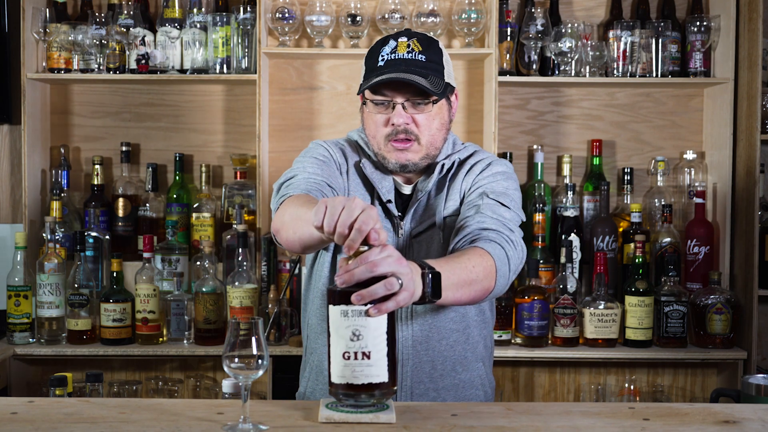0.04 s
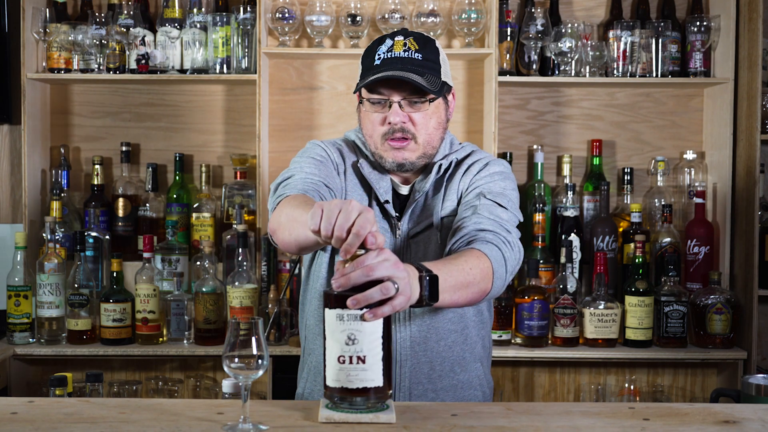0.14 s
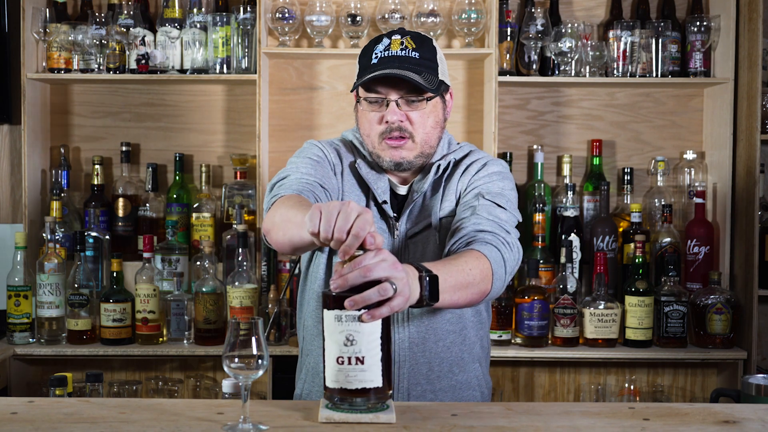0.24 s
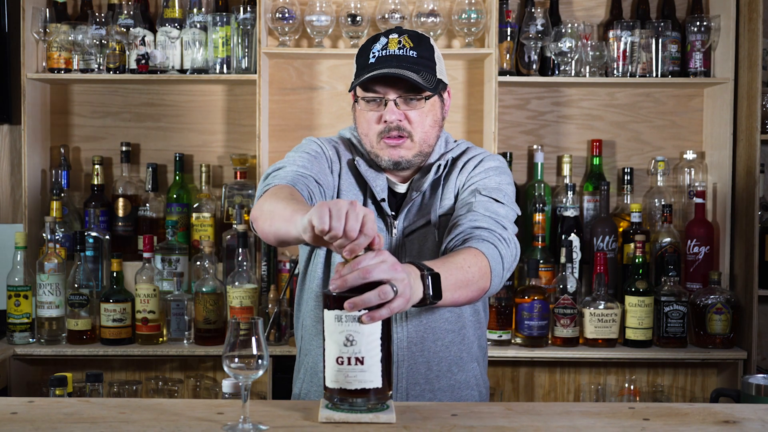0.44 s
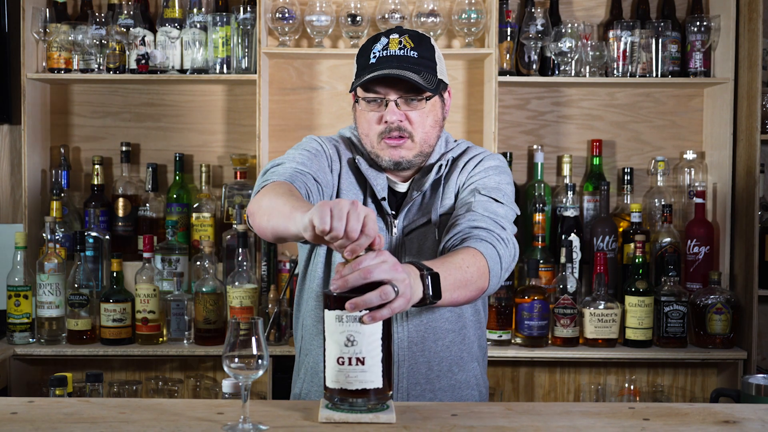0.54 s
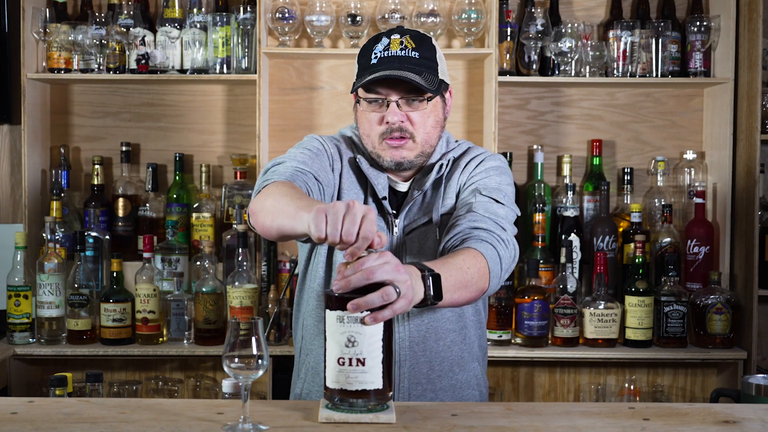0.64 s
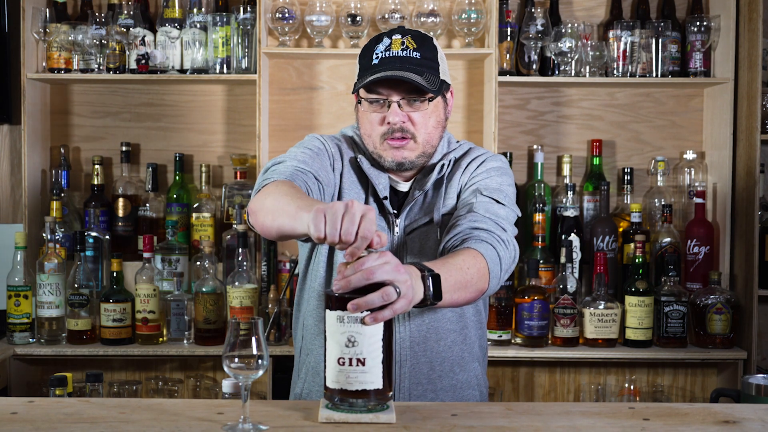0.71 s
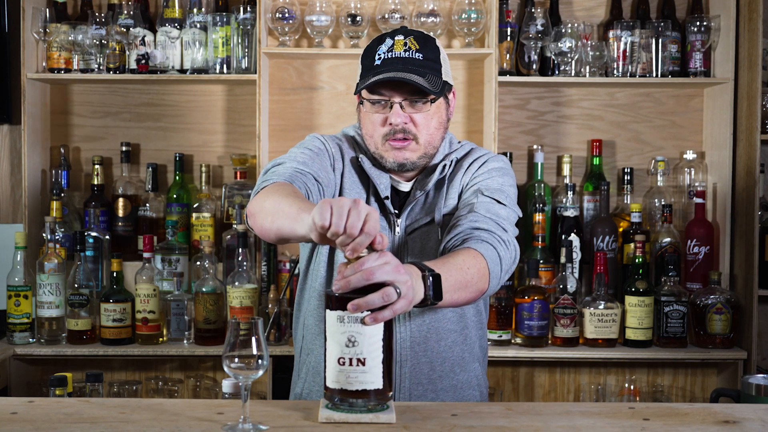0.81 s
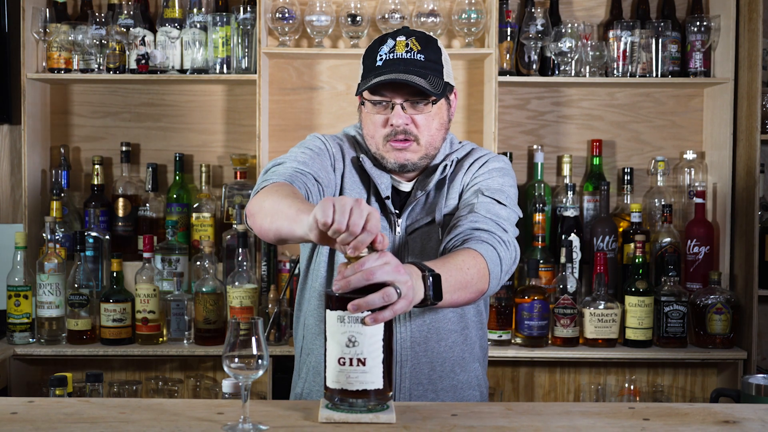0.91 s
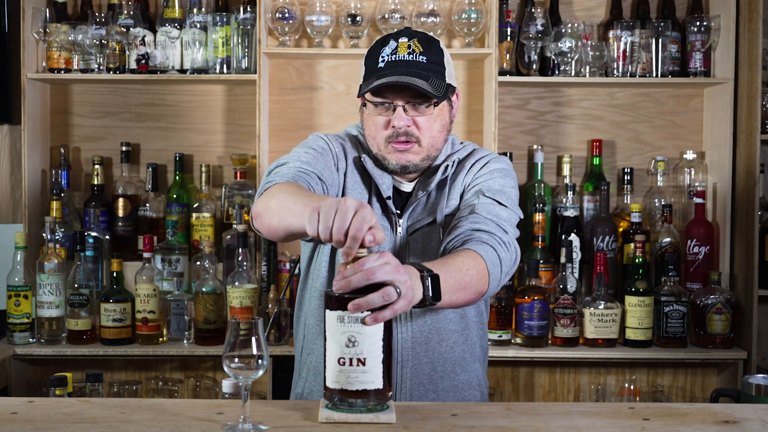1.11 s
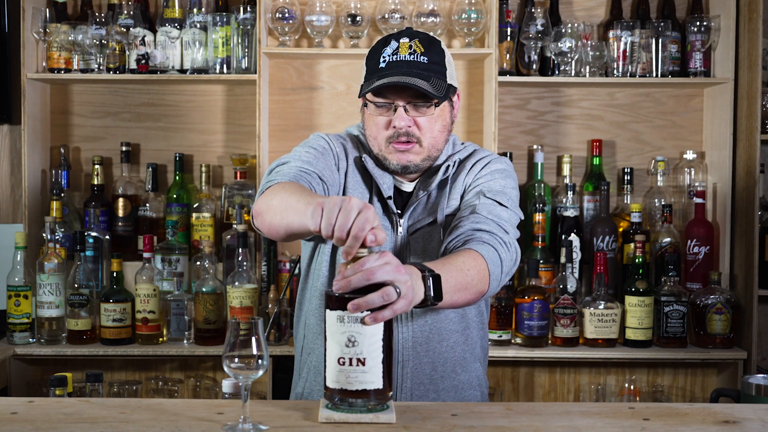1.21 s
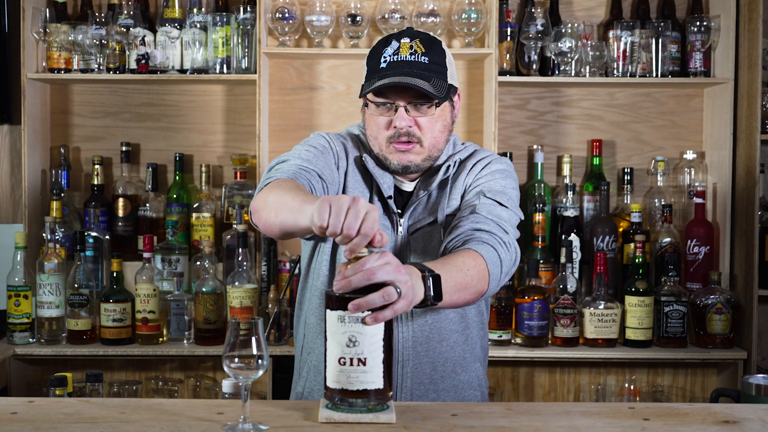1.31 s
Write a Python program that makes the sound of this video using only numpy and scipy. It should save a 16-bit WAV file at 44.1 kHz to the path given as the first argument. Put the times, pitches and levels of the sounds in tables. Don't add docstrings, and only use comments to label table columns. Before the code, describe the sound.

Cork stopper being worked loose from a bottle, with small clicks and finger friction around three woody knocks that get softer each time, scattered short reflections from shelves, low room tone, muffled mono recording.

```python
import sys
import numpy as np
from scipy import signal
from scipy.io import wavfile
from scipy.ndimage import uniform_filter1d

SR = 44100
rng = np.random.default_rng(int(sys.argv[2]) if len(sys.argv) > 2 else 0)


def dump(signal):
    limited = np.clip(np.atleast_2d(signal).T, -1, 1)
    pcm = np.round(limited * 32767).astype(np.int16)
    wavfile.write(sys.argv[1], SR, pcm)


def undo_db(level):
    steps = np.asarray(level, float) / 20
    return 10 ** steps


N = 59535


def evened(x):
    return x / np.sqrt(np.mean(x ** 2) + 1e-20)


def read_colour(points, hz):
    f, level = np.transpose(points)
    return np.interp(np.log(hz + 1), np.log(f + 1), level)


def read_level(points):
    t, level = np.transpose(points)
    return np.interp(np.arange(N) / SR, t, level)


def add(mix, s, sound):
    part = mix[round(s * SR):][:len(sound)]
    part += sound[:len(part)]


# [f/Hz, level/dB per Hz]
ROOM_COLOUR = [(30, -28.5), (70, 3.5), (120, -5), (380, -7.5), (600, -18), (1430, -18), (2500, -24.5),
               (7500, -33)]
# [t/s, level/dB]
ROOM_LEVEL = [(0, 2.5), (.2, 3.5), (0.272, -2.5), (.39, -1), (.42, 3), (.66, 3), (.8, -1), (1, 0.5),
              (1.1, -0.5), (1.199, 5.5), (1.35, -4.5)]


def room():
    room_db, patch_db, swell_db = -66, 2.5, .7
    frames, hz = N // 256 + 5, np.fft.rfftfreq(1024, 1 / SR)
    real, imaginary, patches = rng.standard_normal((frames, 513, 3)).T
    patches = uniform_filter1d(patches, size=6, axis=0)
    patches = evened(uniform_filter1d(patches, size=8, axis=1))
    swell = evened(uniform_filter1d(rng.standard_normal(frames), size=12))
    level = read_colour(ROOM_COLOUR, hz)[:, None] + patch_db * patches + swell_db * swell
    spectra = (real + 1j * imaginary) * undo_db(level)
    tone = signal.istft(spectra, nperseg=1024, noverlap=768)[1][:N]
    return undo_db(room_db + read_level(ROOM_LEVEL)) * evened(tone)


# [t/s, level/dB]
RUB_LEVEL = [(0, -70.5), (.2, -69), (.27, -86.5), (.34, -82.5), (0.378, -64), (0.452, -58), (.49, -65.5),
             (0.549, -55.5), (.59, -62), (.62, -79), (.68, -67), (0.712, -98), (0.849, -80), (1.03, -68.5),
             (1.1, -78), (1.23, -70), (1.27, -84.5), (1.33, -66.5)]
# [f/Hz, level/dB per Hz]
RUB_COLOUR = [(300, -25), (600, -8.5), (1000, 7), (2000, 4.5), (3500, 2), (5000, -4.5), (7500, -3.5)]


def rub():
    grains_per_s, grain_db, smooth_share = 2500, 3, .6
    sizes = undo_db(grain_db * np.minimum(rng.exponential(1, N), 5))
    grains = sizes * (rng.random(N) < grains_per_s / SR) * rng.choice([-1., 1.], N)
    drive = smooth_share * rng.standard_normal(N) + (1 - smooth_share) * evened(grains)
    hz = np.fft.rfftfreq(N, 1 / SR)
    colour = undo_db(read_colour(RUB_COLOUR, hz)) * (hz > 400)
    friction = np.fft.irfft(np.fft.rfft(drive) * colour, N)
    return undo_db(read_level(RUB_LEVEL)) * evened(friction)


# [t/s, peak level/dB, centre f/Hz]
TICKS = [(0.0517, -47.5, 5500), (.1088, -46.5, 4500), (0.1365, -40, 3500), (0.1759, -47.5, 5000),
         (.1947, -70, 3500), (0.403, -49, 4500), (.4475, -39, 4500), (0.4642, -44, 5000), (.520, -44, 5000),
         (0.7841, -44.5, 4500), (0.9617, -50.5, 4500), (1.1845, -47.5, 3600), (1.2185, -48, 2500),
         (1.2373, -44.5, 3000)]


def ticks():
    width_s = .00008
    out, t = np.zeros(N), np.arange(-40, 41) / SR
    for s, db, hz in TICKS:
        swell = np.exp(-.5 * (t / width_s) ** 2)
        add(out, s + t[0], undo_db(db) * swell * np.cos(2 * np.pi * hz * t))
    return out


def blow(modes):
    rise_s = 0.00027
    t, out = np.arange(6000) / SR, np.zeros(6000)
    for hz, db, t60, full in modes:
        swell = (t / full) ** (np.log(1000) * full / t60)
        decay = undo_db(db - 60 * (t - full) / t60)
        out += decay * swell * np.sin(2 * np.pi * hz * t)
    return np.minimum(t / rise_s, 1) ** 2 * out


def clump(s, spread, db, low_hz, high_hz):
    band = signal.butter(8, [low_hz, high_hz], "band", fs=SR, output="sos")
    swell = np.exp(-.5 * ((np.arange(N) / SR - s) / spread) ** 2)
    return undo_db(db) * swell * signal.sosfilt(band, rng.standard_normal(N))


def jolt(modes, blows, shelf, echoes):
    t, out = np.arange(6000) / SR, np.zeros(N)
    for s, db in blows:
        add(out, s, undo_db(db) * blow(modes))
    hum = sum(undo_db(db - 60 * t / t60) * np.sin(2 * np.pi * hz * t) for hz, db, t60 in shelf)
    taps = sum(clump(*row) for row in echoes)
    return out + signal.oaconvolve(taps, hum / np.linalg.norm(hum))[:N]


# [f/Hz, level/dB, time to fall 60 dB/s, time
# to full swing/s]
HARD_MODES = [(251.3, -17, 0.02, .004), (382, -26.5, 0.018, 0.0012), (532, -24.5, 0.061, 0.0012),
              (2743, -36.5, 0.06, 0.001043), (3550, -30.5, 0.021, 0.0013), (5720, -45, .018, 0.0014),
              (6000, -46.5, 0.013, .001),
              (900, -10, .014, .002), (1280, -13, .012, .001), (1560, -15, .014, .002),
             (1755, -8, .009, .0027), (2056, -15, .012, .002)]
# [f/Hz, level/dB, time to fall 60 dB/s, time to full
# swing/s]
CRACK = [(180, -18, .012, .002), (1080, -1, .006, .0015), (1380, 1, .0045, .0007),
         (3000, -13.5, .003, .0005), (4310, -32, 0.0013, 0.0018), (6493, -31, 0.0052, 0.00027)]
# [t/s, level/dB]
HARD_BLOWS = [
    (.2359, 1),
    (.2422, -9),
]
# [f/Hz, level/dB, time to fall 60 dB/s]
HARD_SHELF = [(250, -8.5, .03), (355, -2, .035), (722.4, -3, 0.0067), (996, -1.5, 0.022), (1200, -1, 0.016),
              (1400, 1, 0.013), (1606, 1, 0.047), (1780, -3, .025), (1990, -8.5, .02), (2312, -18.5, .02),
              (2718, -13, 0.07), (3540, -22, .05), (5900, -28.5, .02)]
# [centre t/s, spread/s, level/dB, low f/Hz, high f/Hz]
HARD_ECHOES = [
    (.213, 0.0055, -49.5, 496, 2180),
    (0.228, 0.0059, -42, 200, 6400),
    (.252, .005, -34.5, 200, 3500),
    (.277, .009, -32.5, 200, 2400),
    (.278, 0.013, -38, 2600, 3570),
    (0.316, 0.014, -43.5, 190, 2900),
    (0.341, 0.013, -44.5, 620, 2450),
    (.36, 0.022, -46.5, 1450, 1805),
    (.376, .012, -52.5, 580, 1300),
]


def hard_jolt():
    out = jolt(HARD_MODES, HARD_BLOWS, HARD_SHELF, HARD_ECHOES)
    add(out, HARD_BLOWS[0][0], blow(CRACK))
    return out


# [f/Hz, level/dB, time to fall 60 dB/s, time to full swing/s]
FIRM_MODES = [(345, -23.5, 0.032, 0.0021), (751.5, -1.5, 0.0056, 0.0042), (823, -26.5, 0.06, 0.0036),
              (1054, -10.5, 0.0045, 0.0019), (1528, -12.5, 0.0072, 0.0031), (1900, -26.5, 0.01, .002),
              (2426, -35, 0.025, .002)]
# [t/s, level/dB]
FIRM_BLOWS = [
    (.6812, -7.5),
    (.6900, -16),
]
# [f/Hz, level/dB, time to fall 60 dB/s]
FIRM_SHELF = [(350, -11.5, 0.027), (720, -8, 0.017), (813, 4.5, 0.014), (1150, -3, 0.0065),
              (1500, -20.5, 0.03), (1900, -17, .015), (2450, -18.5, 0.018)]
# [centre t/s, spread/s, level/dB, low f/Hz, high f/Hz]
FIRM_ECHOES = [
    (.662, 0.0052, -47.5, 900, 1800),
    (.675, 0.0048, -37, 981.4, 2600),
    (0.705, 0.0066, -42, 300, 2700),
    (0.713, .01, -39.5, 638, 918),
    (.722, 0.0067, -49, 300, 2400),
    (0.735, 0.0034, -56.5, 400, 1400),
]


def firm_jolt():
    return jolt(FIRM_MODES, FIRM_BLOWS, FIRM_SHELF, FIRM_ECHOES)


# [f/Hz, level/dB, time to fall 60 dB/s, time to full swing/s]
SOFT_MODES = [(200, -23.5, 0.026, 0.0065), (348.4, -15, 0.015, 0.01), (738.6, 3, 0.0046, 0.0053),
              (1097, -26.5, .015, 0.0094), (1434, -12.5, 0.01, 0.0034), (1910, -36.5, 0.025, 0.0023)]
# [t/s, level/dB]
SOFT_BLOWS = [
    (1.1729, -23.5),
              (.414, -49),
]
# [f/Hz, level/dB, time to fall 60 dB/s]
SOFT_SHELF = [(136, 1, 0.037), (220, -2, 0.026), (360, -4, 0.038), (755, -1, 0.01), (1400, -7, .02)]
# [centre t/s, spread/s, level/dB, low f/Hz, high f/Hz]
SOFT_ECHOES = [
    (0.053, 0.0033, -52.5, 200, 1500),
    (.9, 0.032, -57.5, 1363, 1566),
    (1.018, 0.0075, -52, 495, 1500),
    (1.164, 0.0068, -52, 200, 1944),
    (1.194, 0.015, -53.5, 108, 1053),
    (1.5, 0.014, -55.5, 84, 400),
]


def soft_jolt():
    return jolt(SOFT_MODES, SOFT_BLOWS, SOFT_SHELF, SOFT_ECHOES)


def scene():
    knocks = hard_jolt() + firm_jolt() + soft_jolt()
    thin = signal.butter(3, 170, "high", fs=SR, output="sos")
    knocks = signal.sosfilt(thin, knocks)
    return (room() + rub() + ticks() + knocks)[None]


def top_cut(x):
    return signal.sosfilt(signal.butter(12, 20000, fs=SR, output="sos"), x)


def record(dry):
    edge_hz, low_hz, hiss_db = 7750, 70, -100
    dull = signal.firwin(301, edge_hz, window=("kaiser", 9), fs=SR)
    x = signal.oaconvolve(dry, dull[None], "same")
    x = signal.sosfilt(signal.butter(3, low_hz, "high", fs=SR, output="sos"), x)
    x = x + undo_db(hiss_db) * rng.standard_normal(x.shape)
    return top_cut(x)


dry = scene()
out = record(dry)
dump(out)
```